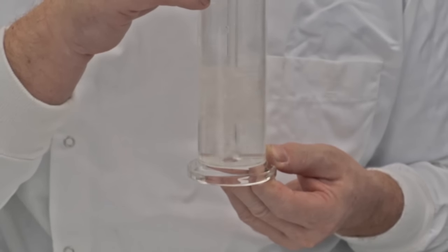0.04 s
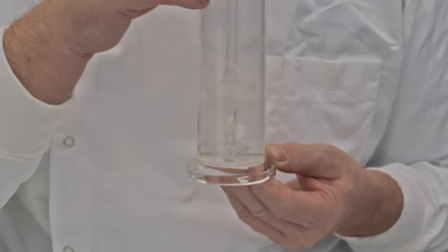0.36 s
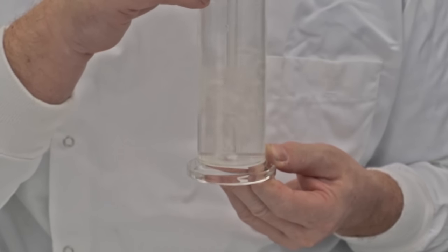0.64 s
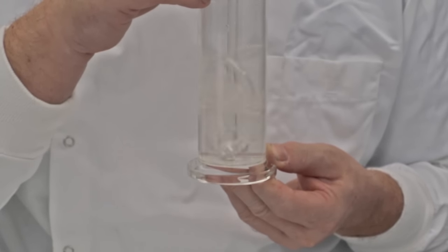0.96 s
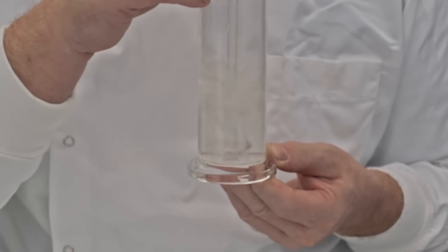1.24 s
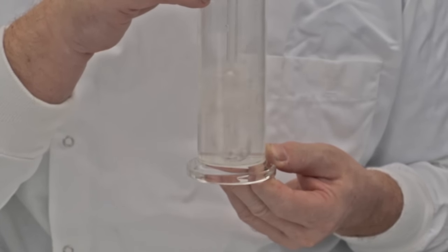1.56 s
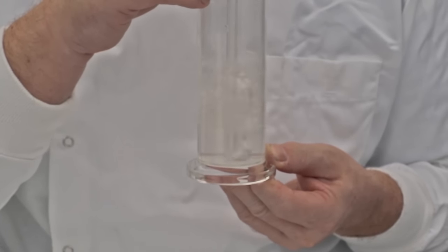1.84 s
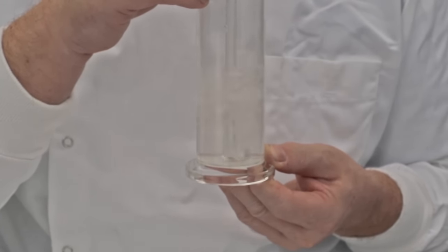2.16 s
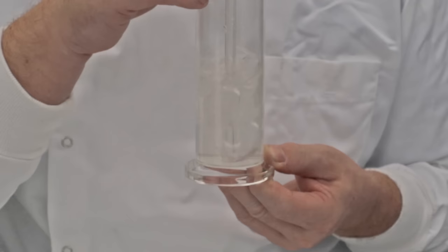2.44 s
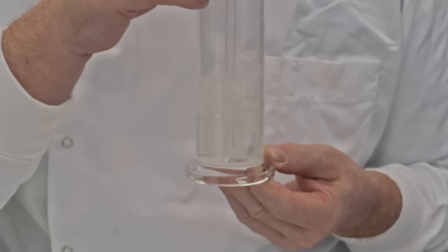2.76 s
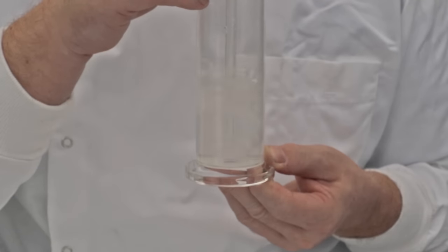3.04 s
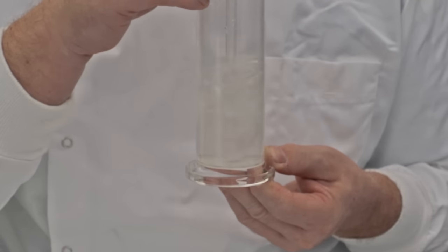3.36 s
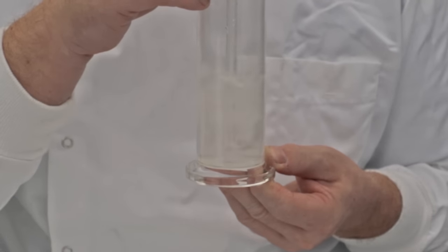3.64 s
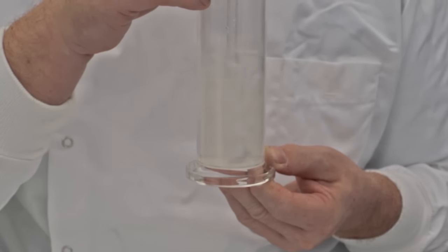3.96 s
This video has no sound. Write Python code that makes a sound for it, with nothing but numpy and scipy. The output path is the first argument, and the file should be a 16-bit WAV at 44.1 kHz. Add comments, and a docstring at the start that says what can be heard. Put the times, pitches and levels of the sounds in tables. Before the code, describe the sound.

Rapid, irregular gurgling of gas through liquid in a tall glass vessel, heard close up.

```python
"""Gas bubbling in a glass cylinder

Close up in a quiet room, the tall cylinder a little left of a stereo microphone. Large bubbles leave
a dip tube with short low gulps. At the surface, bubbles plop and burst and ring the air column above
the liquid, whose pitches shift as the level heaves. Underneath, a deep rumble dies away at the start
and a low hum swells and fades."""
import sys
import numpy as np
from scipy import signal
from scipy.fft import rfft, irfft, next_fast_len
from scipy.io import wavfile
from scipy.ndimage import uniform_filter1d, map_coordinates

SR = 44100
rng = np.random.default_rng(int(sys.argv[2]) if len(sys.argv) > 2 else 0)


def wrap_up_sound(samples):
    """Save the sound to the file named by the first command line argument, as 16-bit audio."""
    columns = np.atleast_2d(samples).T
    # keep every value between -1 and 1, then stretch to whole-number steps
    tamed = np.clip(columns, -1, 1)
    steps = np.round(tamed * 32767).astype(np.int16)
    wavfile.write(sys.argv[1], SR, steps)


N = 176400

# Spectrum of the background rush. Each row: frequency in Hz, relative density in dB.
RUSH_SPECTRUM = [(20, -8.5), (45, -7), (100, -4.5), (200, -2.5), (380, -12.5), (600, -16), (1150, -23.5),
                 (1800, -28), (3500, -32), (12000, -36.5), (15500, -42)]
# Swell of the hum. Each row: time in seconds, relative level in dB.
HUM_SWELL = [(0, -75), (1.35, -70.5), (2.1, -57.5), (3.05, -59), (3.6, -61.5), (4, -69)]
# Room sound at the microphone. Each row: frequency in Hz, left-right likeness from 0 to 1.
STEREO_LIKENESS = [(100, 0.95), (600, 1), (2000, 0.7), (6000, 0.077), (15000, 0.047)]
# Decay of the room. Each row: frequency in Hz, seconds to fall 60 dB.
ROOM_DECAY = [(150, 0.068), (6000, 0.16), (15000, 0.15)]
# Resonances of the air in the glass. Each row: pitch in Hz, width in Hz, gain in dB, left over right in dB.
AIR_MODES = [(1177, 42, -4.5, 4.5), (1590, 34, -11, -7), (2467, 51.6, 7.5, -2), (4309, 67, -3.5, 10.5),
             (5630, 62, 1, 6), (5985, 52, -3.5, -3.5), (7255, 113, -11, -17), (8240, 54, -12.5, 18),
             (8700, 89, -6, 5.5), (10030, 73, -5.5, 11.5), (13500, 87, -31, -16)]
# Small bubbles bursting. Each row: start in seconds, relative level in dB, pitch in Hz,
# snap of the film over the tone in dB.
BURSTING_BUBBLES = [(0.099, -55.5, 5490, -6), (0.269, -40.5, 5880, -17.5), (0.347, -55.5, 5490, -15),
                    (0.3701, -50, 5550, 3), (0.5428, -37, 5830, -4.5), (0.7807, -44, 5980, -10.5),
                    (0.817, -44.5, 5480, -9.5), (0.933, -47.5, 2383, -27), (0.971, -54, 5570, -5),
                    (1.0601, -52, 2460, 21), (1.172, -54.5, 2460, 5), (1.2986, -50, 4550, -9),
                    (1.3417, -46, 5436, -7.5), (1.4677, -53, 9100, -3.5), (1.5668, -43.5, 5640, -22),
                    (1.7256, -53.5, 2460, 31), (1.8248, -51, 4380, -2.0), (1.8821, -49, 6040, -31),
                    (1.918, -55.5, 4400, 2), (2.015, -55.5, 4030, 7), (2.11, -52.5, 2550, 6),
                    (2.1956, -48.5, 8640, -3.5), (2.2252, -50, 3960, -10), (2.4611, -41, 9050, -12),
                    (2.5, -49, 2820, -10), (2.5485, -47, 9650, 0.5), (2.5753, -49.5, 7500, -7),
                    (2.882, -54.5, 5750, -12), (2.9381, -51, 5940, -10), (3.0554, -54, 4970, -4),
                    (3.11, -51, 5400, -2), (3.14, -54, 4080, 6), (3.1854, -53.5, 2740, 27),
                    (3.328, -44, 9400, -13), (3.3463, -45.5, 5730, -28), (3.357, -49.5, 10700, -21),
                    (3.3694, -45.5, 4250, 0.5), (3.4645, -49, 8900, -31), (3.497, -47, 5860, 13),
                    (3.6276, -51.5, 2420, 5), (3.7847, -52, 9680, -11), (3.9542, -48.5, 10340, -38)]
# Bubbles ringing in the liquid. Each row: start in seconds, level in dB, pitch in Hz.
RINGING_BUBBLES = [(0.063, -54.5, 4300), (0.0856, -53.5, 1010), (0.314, -59.5, 2460), (0.488, -57.5, 4200),
                   (0.5255, -41, 359), (0.528, -49.5, 1310), (0.586, -56, 4370), (0.599, -55.5, 1370),
                   (0.623, -54.5, 1420), (0.781, -41.5, 2325), (0.803, -57.5, 1240), (0.821, -42.5, 3500),
                   (0.932, -55.5, 1073), (0.986, -50.5, 1210), (1.106, -54.5, 2380), (1.15, -52, 4180),
                   (1.347, -44.5, 335), (1.5892, -51.5, 1034), (1.704, -57.5, 2390), (1.957, -55.5, 2300),
                   (2.0174, -54, 1240), (2.116, -52.5, 1083), (2.2006, -50, 1040), (2.282, -50, 382),
                   (2.3324, -46, 1420), (2.815, -53, 930), (2.9665, -48, 920), (3.0323, -51, 1470),
                   (3.042, -53.5, 2490), (3.173, -53.5, 1100), (3.6187, -50.5, 1490), (3.62, -48.5, 2290),
                   (3.9364, -53, 1294)]
# Large bubbles leaving the tube. Each row: time of the peak in seconds, relative level in dB.
LARGE_BUBBLES = [(0.033, -41), (0.0912, -39), (0.154, -44), (0.1711, -34.5), (0.2154, -38.5), (0.247, -38),
                 (0.303, -39), (0.3309, -42.5), (0.4742, -34.5), (0.529, -39), (0.6259, -41), (0.7483, -34),
                 (0.805, -39), (0.8203, -39.5), (0.932, -39.5), (0.9869, -37), (1.0484, -42.5),
                 (1.0994, -41), (1.1536, -44.5), (1.218, -46), (1.259, -33.5), (1.3447, -37),
                 (1.436, -42.5), (1.4675, -38.5), (1.5463, -41.5), (1.5852, -38.5), (1.65, -44),
                 (1.7086, -39), (1.7915, -38), (1.8147, -41), (1.8817, -42.5), (1.9016, -42),
                 (1.9174, -38.5), (1.9831, -41.5), (2.0162, -42), (2.0875, -36.5), (2.1006, -39),
                 (2.1509, -37), (2.2138, -34.5), (2.2803, -39.5), (2.3043, -40), (2.3217, -36.5),
                 (2.465, -37), (2.487, -41.5), (2.5464, -42.5), (2.5952, -43), (2.6655, -38.5),
                 (2.7396, -38.5), (2.8034, -41), (2.8267, -37.5), (2.8569, -40.5), (2.8771, -40),
                 (2.934, -40.5), (2.944, -42.5), (3.0437, -37), (3.0709, -39), (3.1139, -43.5),
                 (3.142, -35.5), (3.1779, -39), (3.3017, -39), (3.3556, -33.5), (3.487, -41), (3.5751, -46),
                 (3.6212, -35.5), (3.7179, -41), (3.761, -40.5), (3.8221, -37.5), (3.8729, -38.5),
                 (3.9405, -38.5), (3.9968, -40.5)]

LEFT_DB, LEFT_LEAD_MS, TOP_HZ = 2.9, .066, 15900
BUBBLE_SAMPLES, PITCH_RISE = 2048, 0.11  # the rise is a fraction of the pitch per 30 dB of decay
HEAVE_SPREAD, MODE_SPREAD_DB, BYPASS_DB = 0.0234, 3.5, -18  # bypass: sound that misses the air column
SWELL_CYCLES, SNAP_T60, SNAP_BAND_HZ = 0.69, 0.02, [1800, 8000]  # the wet film dulls the snap
SPATTER_PER_S, SPATTER_DB, SPATTER_SETTLE_S = 1600, -71, 0.011
FOAM_LAG_S, FOAM_DB, FOAM_GROWS_DB_PER_S, FOAM_HZ, FOAM_CYCLES = .012, -33, 5.5, 11300, 67
FIZZ_PER_S, FIZZ_DB, FIZZ_HZ, FIZZ_CYCLES, FIZZ_SNAP_DB = 50, -59, 5406, 50, -4
POP_GAIN_DB, SPRAY_DB, SPRAY_GAP_S = 5.5, -7, .006
SLOSH_PER_S, SLOSH_DB, SLOSH_HZ, SLOSH_CYCLES = 42, -65, 835, 7.5
PLOP_SNAP_DB, SPLASH_DB, SPLASH_SPREAD_S = -14, -18.5, 0.0073
GULP_HZ, GULP_SPREAD, GULP_WIDTH_CYCLES, GULP_GAIN_DB = 283.6, 0.16, 0.42, 0.5
PINCH_HZ, PINCH_DB = 880, -24.5
AFTERSWING_DB, AFTERSWING_HZ, AFTERSWING_T60 = -11, 324.2, 0.064
CHURN_PER_S, CHURN_DB, CHURN_HZ = 65, -48.5, 246.6


def amp(db):
    """Decibels to gain."""
    return 10 ** (np.asarray(db) / 20)


def unit(x):
    """Scaled to rms 1."""
    return x / np.sqrt(np.mean(x ** 2) + 1e-20)


def unit_crest(x):
    """Scaled so that the loudest 3 ms have rms 1."""
    return x / np.sqrt(uniform_filter1d(np.mean(x ** 2, axis=0), size=130).max() + 1e-20)


def along(points, hz):
    """Interpolate (Hz, value) points on a log axis."""
    f, v = np.transpose(points)
    return np.interp(np.log(hz + 1), np.log(f + 1), v)


def wander(rate):
    """A smooth random curve, rate knots a second."""
    return map_coordinates(rng.standard_normal(int(N * rate / SR) + 4), [np.arange(N) * rate / SR])


def filtered(x, response):
    """x through a complex response of frequency."""
    m = next_fast_len(N + SR // 2)
    return irfft(rfft(x, m) * response(np.fft.rfftfreq(m, 1 / SR)), m)[..., :N]


def pan(db):
    """Left and right gains for a level difference."""
    return amp(np.array([[db], [-db]]) / 2)


def add(out, start_s, x):
    """Mix x into out at start_s."""
    i = int(round(start_s * SR))
    a, b = max(i, 0), min(i + x.shape[-1], N)
    if b > a:
        out[..., a:b] += x[..., a - i:b - i]


def chance(per_s, count=500):
    """Random events. Each row: start in seconds, two normal draws."""
    starts = np.cumsum(rng.exponential(size=count)) / per_s
    return np.column_stack([starts, rng.standard_normal((count, 2))])[starts < N / SR]


def stream():
    """A separate random generator for one layer."""
    return np.random.default_rng(rng.integers(2 ** 31))


def rush():
    """Soft rush of the room and the moving liquid, narrow in the bass and wide in the treble."""
    def mid_and_side(hz):
        angle = np.arccos(np.clip(along(STEREO_LIKENESS, hz), -1, 1)) / 2
        return amp(along(RUSH_SPECTRUM, hz)) * [np.cos(angle), np.sin(angle)]
    mid, side = filtered(rng.standard_normal((2, N)), mid_and_side)
    return amp(-57 + 0.57 * wander(15)) * unit(np.array([mid + side, mid - side]))


def hum(hz=93, drift_hz=.8, gain_db=-1):
    """A low wavering tone swells and fades."""
    level_db = np.interp(np.arange(N) / SR, *np.transpose(HUM_SWELL)) + gain_db + 2 * wander(6.8)
    pitch = hz + drift_hz * wander(7.42)
    return amp(level_db) * unit(np.sin(2 * np.pi * np.cumsum(pitch) / SR))


def rumble(hz=42, start_db=-54, t60=.6):
    """A deep rumble fades in the first moments."""
    noise = filtered(rng.standard_normal(N), lambda f: 1 / (1 + 10 * (f / hz - 1) ** 2))
    return amp(start_db - 60 * np.arange(N) / SR / t60) * unit(noise)


def room(x):
    """The room returns a short diffuse tail, 4 ms behind the direct sound."""
    hz, t, spectra = signal.stft(rng.standard_normal((2, SR // 2)), SR, nperseg=256)
    decay = amp(-60 * t / along(ROOM_DECAY, hz)[:, None])
    tail = signal.istft(spectra * decay, SR, nperseg=256)[1]
    tail = np.pad(tail / np.linalg.norm(tail[0]), ((0, 0), (SR // 250, 0)))
    left, other = signal.fftconvolve(x, tail, axes=1)[:, :N]
    shared = filtered(left, lambda f: amp(-LEFT_DB) * along(STEREO_LIKENESS, f))
    apart = filtered(other, lambda f: np.sqrt(1 - np.clip(along(STEREO_LIKENESS, f), 0, 1) ** 2))
    return np.array([left, shared + apart])


def air_column(f, modes):
    """Stereo response of the air standing above the liquid: a sum of resonances."""
    return sum(pan(side_db) * amp(db) * 1j * f * width / (hz ** 2 - f ** 2 + 1j * f * width)
               for hz, width, db, side_db in modes)


def ring_cycles(hz):
    """Cycles a bubble takes to fall 60 dB; smaller, higher ones ring for more."""
    return 20.3 * (hz / 1000) ** 0.41


def bubble(hz, cycles, snap_db, draw):
    """A bubble's rising tone and the snap of its film ring the air column, retuned by the heaving."""
    t, f = np.arange(BUBBLE_SAMPLES) / SR, np.fft.rfftfreq(BUBBLE_SAMPLES, 1 / SR)
    t60 = cycles / hz
    pitch = hz * (1 + PITCH_RISE * (np.minimum(2 * t / t60, 2) - .5))
    envelope = (1 - np.exp(-t * hz / SWELL_CYCLES)) * amp(-60 * t / t60)
    tone = envelope * np.sin(2 * np.pi * np.cumsum(pitch) / SR)
    film = signal.butter(1, SNAP_BAND_HZ, "band", fs=SR)
    snap = signal.lfilter(*film, draw.standard_normal(BUBBLE_SAMPLES) * amp(-60 * t / SNAP_T60))
    modes = [(centre * (1 + HEAVE_SPREAD * draw.normal()), width, db + MODE_SPREAD_DB * draw.normal(), side)
             for centre, width, db, side in AIR_MODES]
    column = amp(BYPASS_DB) * pan(LEFT_DB) + air_column(f, modes)
    tone, snap = (unit(irfft(rfft(x) * column)) for x in (tone, snap))
    return unit_crest(tone + amp(snap_db) * snap)


def spatter():
    """Fine droplets tick against the glass, hardest just after each gulp."""
    draw, thrown = stream(), np.zeros(N)
    settling = np.exp(-np.arange(SR // 2) / SR / SPATTER_SETTLE_S)
    for start, db in LARGE_BUBBLES:
        add(thrown, start, amp(db / 2) * settling)
    hits = draw.random(N) < SPATTER_PER_S / SR
    drops = hits * draw.standard_normal(N) * (thrown + thrown.mean())
    highpass = lambda f: f ** 2 / (f ** 2 + FIZZ_HZ ** 2)
    ticks = filtered(drops, lambda f: (amp(BYPASS_DB) + air_column(f, AIR_MODES)) * highpass(f))
    return amp(SPATTER_DB) * unit(ticks)


def foam():
    """Each pop sets off four of the finest bubbles, louder as the foam builds."""
    out, draw = np.zeros((2, N)), stream()
    for start, db, _, _ in BURSTING_BUBBLES:
        for lag in FOAM_LAG_S * draw.exponential(size=4):
            hz = min(FOAM_HZ * np.exp(0.079 * draw.normal()), TOP_HZ)
            level_db = db + FOAM_DB + FOAM_GROWS_DB_PER_S * start + 1.8 * draw.normal()
            add(out, start + lag, amp(level_db) * bubble(hz, FOAM_CYCLES, FIZZ_SNAP_DB, draw))
    return out


def pops():
    """Small bubbles burst in the foam and spray three droplets each: clear ticks over a faint fizz."""
    out, draw = np.zeros((2, N)), stream()

    def fizz(pitch):
        hz = min(FIZZ_HZ * np.exp(.5 * pitch), TOP_HZ)
        return bubble(hz, FIZZ_CYCLES, FIZZ_SNAP_DB, draw)
    for start, db, hz, snap_db in BURSTING_BUBBLES:
        add(out, start, amp(db + POP_GAIN_DB) * bubble(hz, ring_cycles(hz), snap_db, draw))
        for lag in SPRAY_GAP_S * np.cumsum(draw.uniform(.5, 2, size=3)):
            add(out, start + lag, amp(db + SPRAY_DB) * SPRAY_GAP_S / lag * fizz(draw.normal()))
    for start, size, pitch in chance(FIZZ_PER_S):
        add(out, start, amp(FIZZ_DB + 1.5 * min(size, 2)) * fizz(pitch))
    return out


def plops():
    """Bubbles ring just under the surface, which splashes with every gulp and sloshes in between."""
    out, draw = np.zeros((2, N)), stream()
    slosh = lambda pitch: bubble(SLOSH_HZ * np.exp(.25 * pitch), SLOSH_CYCLES, PLOP_SNAP_DB, draw)
    for start, db, hz in RINGING_BUBBLES:
        add(out, start, amp(db) * bubble(hz, ring_cycles(hz), PLOP_SNAP_DB, draw))
    for peak_s, db in LARGE_BUBBLES:
        for lag in (-SPLASH_SPREAD_S / 2 * draw.uniform(), SPLASH_SPREAD_S * draw.uniform()):
            add(out, peak_s + lag, amp(db + SPLASH_DB + 2 * draw.normal()) * slosh(draw.normal()))
    for start, size, pitch in chance(SLOSH_PER_S):
        add(out, start, amp(SLOSH_DB + 6.1 * min(size, 2)) * slosh(pitch))
    return out


def gulp(hz, pinch_db):
    """A centred pressure swing of about a cycle and a half, with a sharp crest as the neck pinches off."""
    t = (np.arange(BUBBLE_SAMPLES) - BUBBLE_SAMPLES // 2) / SR
    swing = lambda f: np.exp(-.5 * (t * f / GULP_WIDTH_CYCLES) ** 2) * np.cos(2 * np.pi * f * t)
    return swing(hz) + amp(pinch_db) * swing(PINCH_HZ * hz / GULP_HZ)


def gulps():
    """Large bubbles break from the tube and swing on weakly; smaller ones churn between them."""
    out = np.zeros(N)
    t, half_s = np.arange(BUBBLE_SAMPLES) / SR, BUBBLE_SAMPLES / 2 / SR
    for peak_s, db in LARGE_BUBBLES:
        pulse = gulp(GULP_HZ * np.exp(GULP_SPREAD * rng.normal()), PINCH_DB + rng.normal(0, 3))
        add(out, peak_s - half_s, amp(db + GULP_GAIN_DB) * pulse)
        hz = AFTERSWING_HZ * np.exp(GULP_SPREAD * rng.normal())
        phase = 2 * np.pi * hz * t * (1 + PITCH_RISE * t / AFTERSWING_T60)
        envelope = (1 - np.exp(-t * hz)) * amp(-60 * t / AFTERSWING_T60)
        add(out, peak_s, amp(db + AFTERSWING_DB) * envelope * np.cos(phase))
    for peak_s, size, pitch in chance(CHURN_PER_S):
        pulse = gulp(CHURN_HZ * np.exp(.3 * pitch), PINCH_DB)
        add(out, peak_s - half_s, amp(CHURN_DB + 2 * min(size, 1.5)) * pulse)
    return out * pan(LEFT_DB)


def scene():
    """The cylinder is close and a little to the left, so that side hears it first; the room is faint."""
    low = gulps() + plops()
    high = pops() + foam() + spatter()
    left_first = lambda hz: np.exp(np.array([[1j], [-1j]]) * np.pi * hz * LEFT_LEAD_MS / 1000)
    direct = filtered(low + high, left_first)
    reverb = amp(-15) * room(low) + amp(-15.5) * room(high)
    background = (rush() + hum() + rumble()) * pan(LEFT_DB)
    return direct + reverb + background


def record(dry):
    """Nothing passes above the band limit."""
    return filtered(dry, lambda hz: hz < TOP_HZ)


dry = scene()
out = record(dry)
wrap_up_sound(out)
```